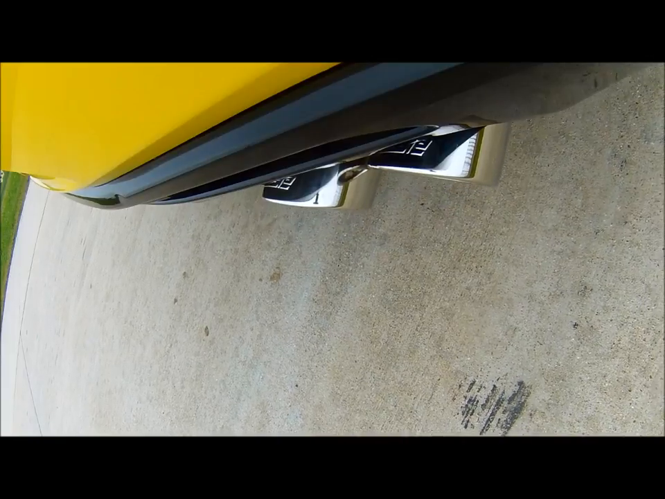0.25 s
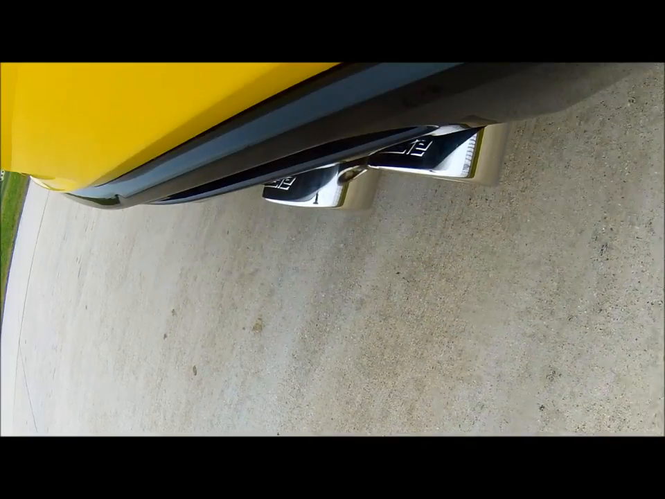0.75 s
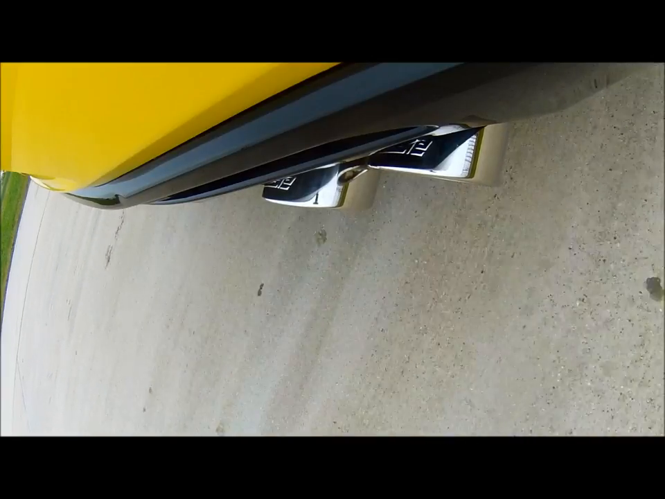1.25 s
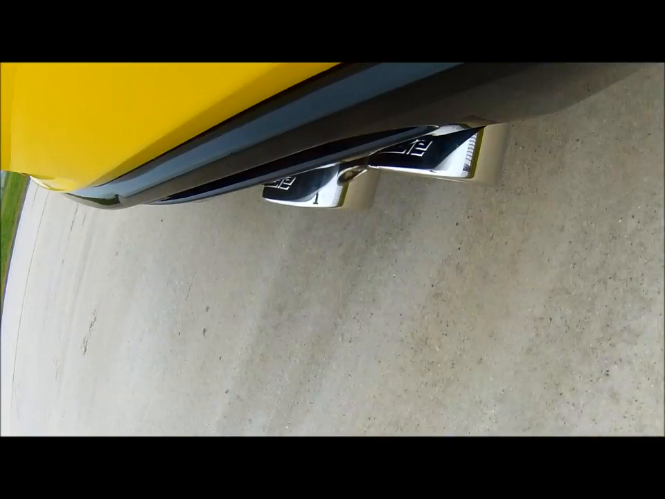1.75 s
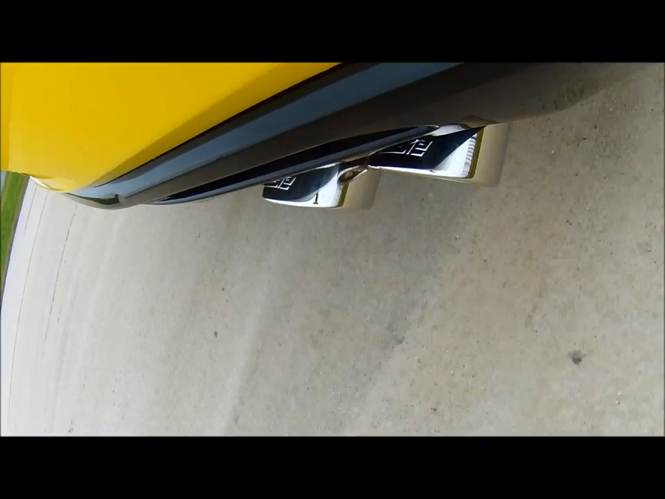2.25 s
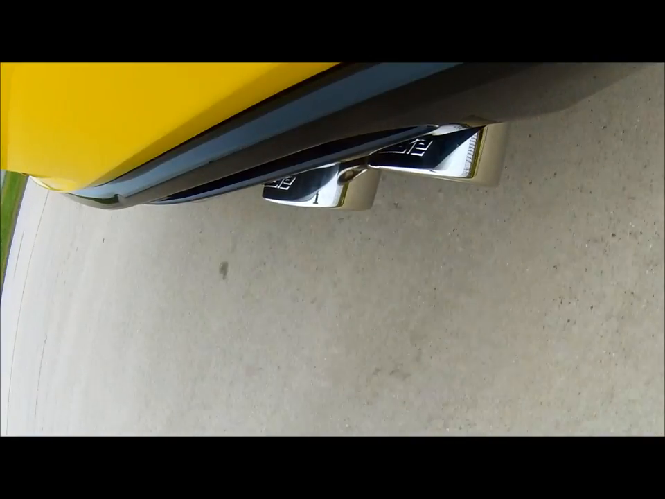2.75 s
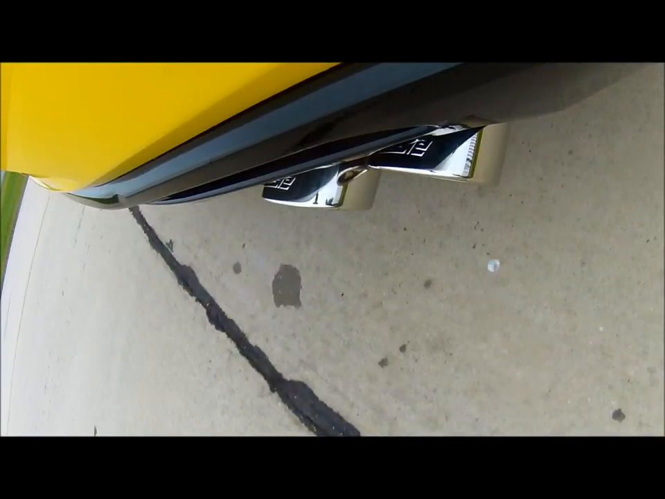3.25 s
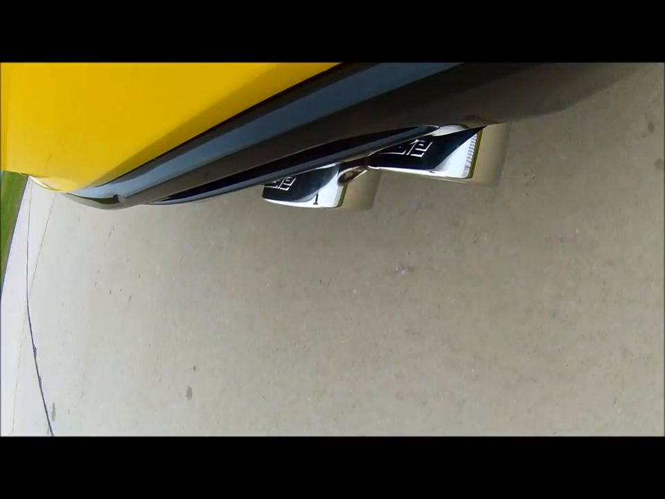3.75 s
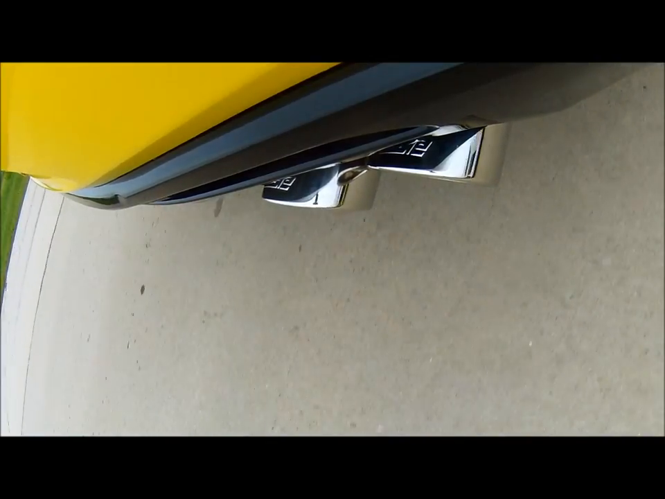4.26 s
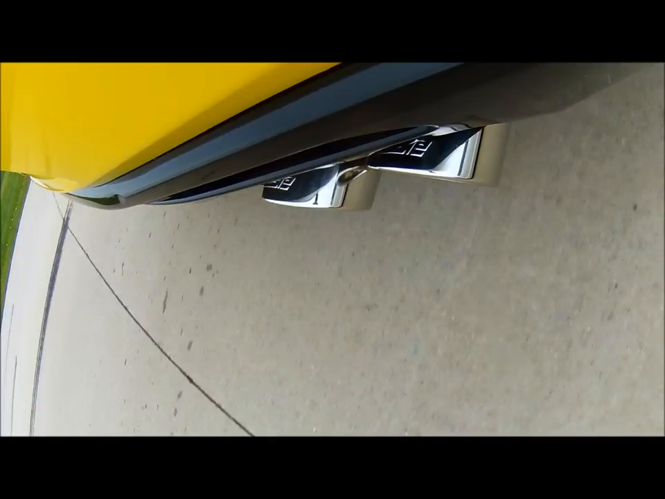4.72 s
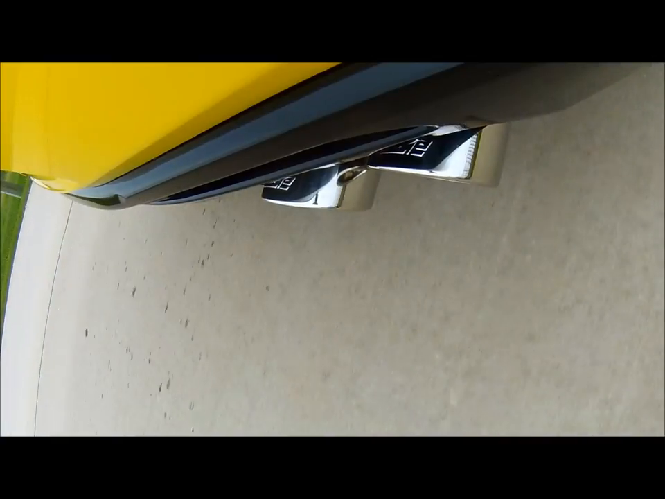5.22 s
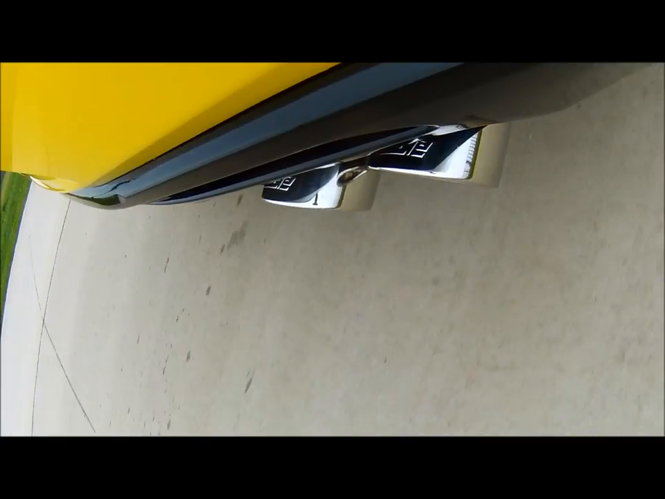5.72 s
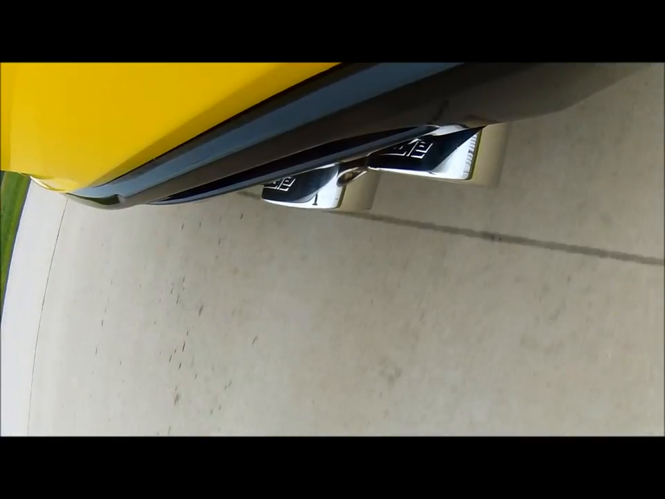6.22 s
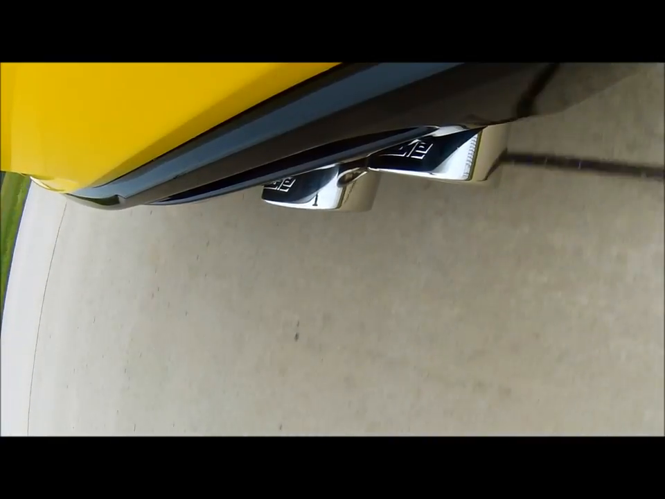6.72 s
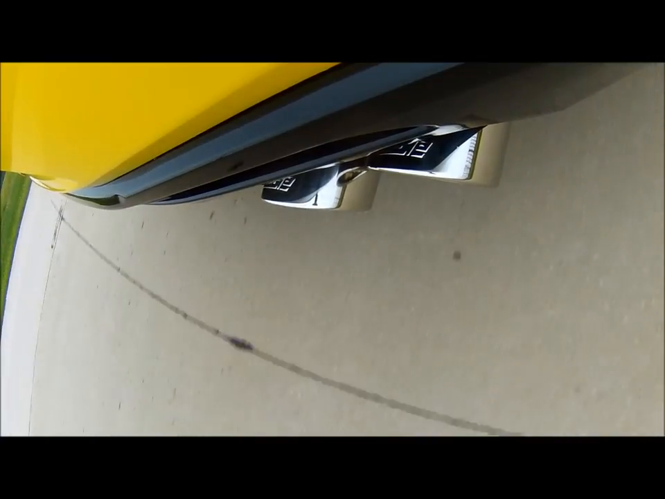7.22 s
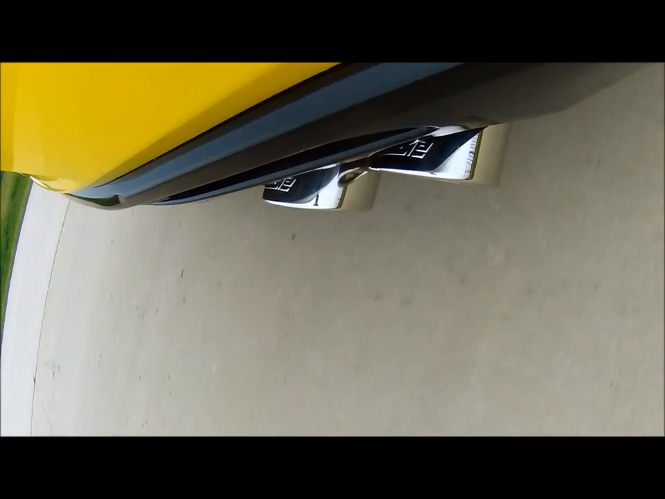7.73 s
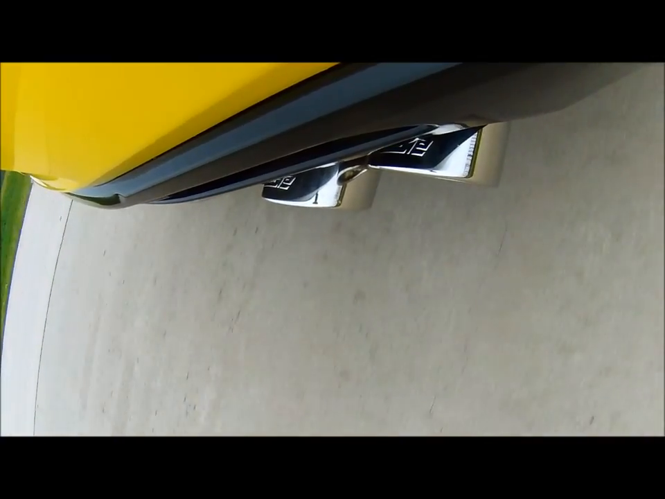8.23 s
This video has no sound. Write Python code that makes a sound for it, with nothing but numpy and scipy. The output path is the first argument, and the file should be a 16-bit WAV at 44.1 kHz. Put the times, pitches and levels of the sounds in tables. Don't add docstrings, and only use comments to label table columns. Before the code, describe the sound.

From a small sealed case just above the tailpipes: faint deep engine throb, ticking grit and low shuddering bumps, then a long hard acceleration. Clean tones and coarse roar rise about an octave and a half in pitch, with thin metal parts singing along. The throttle lifts, pitch sags amid dry rattling, and the next gear bites with a body thump and crackling exhaust blasts, clipped and very loud at the end.

```python
import sys
import numpy as np
from scipy import signal
from scipy.fft import rfft, irfft, next_fast_len
from scipy.io import wavfile

SR = 44100
rng = np.random.default_rng(int(sys.argv[2]) if len(sys.argv) > 2 else 0)


def wrap_up_sound(samples):
    columns = np.atleast_2d(samples).T
    tamed = np.clip(columns, -1, 1)
    steps = np.round(tamed * 32767).astype(np.int16)
    wavfile.write(sys.argv[1], SR, steps)


def level_to_linear(level):
    exponent = np.asarray(level, float) / 20
    return 10 ** exponent


N = 373968
PAD = next_fast_len(N + 8192)
HZ = np.fft.rfftfreq(PAD, 1 / SR) + 1e-3
BEAT_S = 8.397


def rms_one(x):
    return x / np.sqrt(np.mean(x ** 2) + 1e-20)


def in_time(rows):
    s, *columns = np.transpose(rows)
    return [np.interp(np.arange(N) / SR, s, column) for column in columns]


def drift(rate, size=1):
    pole = np.exp(-80 * np.pi * rate / SR)
    noise = rng.standard_normal(N // 40 + 2002)
    slow = signal.lfilter([1], [1, -2 * pole, pole * pole], noise)[2000:]
    return np.interp(np.arange(0, N, size) / 40, np.arange(len(slow)), rms_one(slow))


def band_pass(x, order, low_hz, high_hz):
    return signal.sosfilt(signal.butter(order, [low_hz, high_hz], "band", fs=SR, output="sos"), x)


def bursts(rows, rise_s, shape):
    t, out = np.arange(N) / SR, np.zeros(N)
    for s, level_db, length in rows:
        i = slice(int(s * SR), int((s + 8 * length) * SR))
        age = t[i] - t[i][0]
        out[i] += level_to_linear(level_db) * np.minimum(age / rise_s, 1) * np.exp(-(age / length) ** shape)
    return out * rng.standard_normal(N)


def electronics(shape):
    hiss = level_to_linear(-67.5) * signal.lfilter([1, .12], [1], rng.standard_normal(shape))
    whine = level_to_linear(-79) * np.sin(2 * np.pi * 7300 * np.arange(N) / SR)
    return hiss, whine


# (time [s], peak level [dB], pitch [Hz])
GRIT = [(.334, -44, 2310), (.366, -42, 1790), (.508, -51, 2240), (.694, -44, 2285), (.5, -40, 990),
        (.62, -37, 980), (.69, -34, 1000), (.768, -28, 1000), (.9, -35, 990), (1.2, -41, 2300),
        (2.16, -35.5, 2280), (2.284, -36, 2270), (2.433, -37, 2320), (2.522, -34, 2380),
        (.391, -46, 1810), (.4505, -48, 1820), (.468, -46, 1810), (.526, -46, 1830), (.6, -45, 1790),
         (.756, -45, 1770), (.775, -46, 1790), (.86, -46, 1802), (.9, -46, 1800), (.924, -48, 1810),
         (.995, -46, 1798), (1.03, -47, 1790), (1.08, -47, 1800), (1.542, -49, 1800), (1.632, -48, 1780),
         (2.159, -45, 1824), (2.377, -44, 1790), (2.527, -45, 1750), (.652, -40, 2380), (.74, -45, 2270),
         (.56, -45, 2880), (.63, -45, 2855), (.715, -44, 2870), (.77, -45, 2870), (1.9426, -44, 2250),
         (2.1436, -45, 2860), (2.2674, -43, 2870), (2.504, -40, 2270), (.8, -41, 1400), (.485, -40, 990),
         (.655, -38, 980), (.82, -38, 960), (.955, -40, 991), (1.09, -40, 987)]


def grit():
    out, age = np.zeros(N), np.arange(1500) / SR
    for s, level_db, hz in GRIT:
        i = int(s * SR)
        envelope = np.minimum(age / .0015, 1) * level_to_linear(level_db - 60 * age / .026)
        out[i:i + len(age)] += envelope * np.sin(2 * np.pi * hz * age)
    return out


# (resonance [Hz], width [Hz])
SHEETS = [(322, 16), (775, 45), (1010, 50), (2200, 110), (3360, 200)]
# (level at a roar of -50 dB [dB], share of the roar's swing [dB/dB])
SINGING = [(-54, 0.22), (-54, 0.62), (-67, 1), (-67.5, 1.27), (-65, 1.08)]
# (time [s], note [Hz], peak level [dB], loss either side [dB/s])
SWELLS = [(2.69, 322, -40.5, 33), (4.12, 322, -41, 37), (5.45, 322, -33, 37), (5.07, 322, -34, 24),
          (3.65, 322, -49, 13), (0.089, 322, -52, 20), (7.78, 322, -27, 83), (10, 322, -27, 146),
          (3.8, 775, -46.5, 5), (7.97, 2200, -27, 300), (8.015, 2200, -27.5, 300), (8.25, 2200, -19.5, 200),
          (8.29, 2200, -15, 200), (8.43, 2200, -12, 130), (0.73, 1010, -55, 32), (6.1, 1010, -22, 38),
          (6.71, 1010, -24.5, 40), (7.06, 1010, -21.5, 50), (7.45, 1010, -24, 60), (7.58, 1010, -18, 110),
          (8.22, 1010, -25.5, 120), (0.95, 322, -49, 18), (2.2, 322, -46, 15.5), (3.18, 3360, -53, 7),
          (3.8, 3360, -52, 6), (4.97, 3360, -44.5, 12.5), (5.83, 3360, -30, 19), (7.76, 3360, -41.5, 23)]


def sheets(bark_db):
    out, t = 0, np.arange(N) / SR
    for (hz, width), (base_db, share) in zip(SHEETS, SINGING):
        levels_db = [base_db + share * (bark_db + 50)]
        for s, note, peak_db, loss_db in SWELLS:
            if abs(note / hz - 1) < .2:
                levels_db.append(peak_db - loss_db * np.abs(t - s))
        ring = signal.iirpeak(hz, hz / width, SR)
        sung = signal.lfilter(*ring, signal.lfilter(*ring, rng.standard_normal(N)))
        flutter_db = np.minimum(np.sqrt(hz / 300), 1.8) * drift(20)
        out = out + level_to_linear(np.max(levels_db, axis=0) - 7.5 + flutter_db) * rms_one(sung)
    return out


# (time [s], peak level [dB])
RATTLE = [(2.414, -48), (7.673, -35), (7.675, -33), (7.681, -49), (7.736, -52), (7.805, -36), (7.830, -52),
          (7.872, -42), (7.876, -35), (7.881, -41), (7.905, -41), (7.914, -29), (7.917, -25), (7.9528, -32),
          (7.955, -35), (7.9605, -32), (8.023, -48), (8.092, -49), (8.1147, -39), (8.119, -41),
          (8.128, -27.5), (8.131, -34), (8.197, -48), (8.214, -33), (8.220, -31), (8.226, -44)]


def rattle():
    ticks = bursts([(s, level_db + 9, .0015) for s, level_db in RATTLE], rise_s=.00013, shape=.64)
    return band_pass(signal.lfilter(*signal.butter(1, 9000, fs=SR), ticks), 1, 2800, 6500)


# (time [s], pitch [Hz], level [dB], sag by its end [dB], lull before it [dB])
SWING = [(0.03, 29.6, -49, 1, -11), (0.21, 33, -44, 3, -8), (0.42, 38.86, -45, 3, -14),
         (0.66, 35.5, -35, 5, -4), (0.88, 32.95, -37.5, 4, -5), (1.12, 32, -36, 4, -4),
         (1.36, 38.94, -44, -3, -20), (1.53, 33, -40, 3, -2), (1.78, 30.96, -36, 7, -4),
         (1.94, 36.04, -30.5, 11, -6), (2.22, 34.03, -29.5, 1, -12), (2.38, 32.9, -31, 0.5, -6),
         (2.64, 29.44, -24, 0.5, -22), (3.0, 34.14, -31, -2.5, -6), (3.49, 32.5, -28, -1, -6),
         (3.93, 33.48, -26.5, -1.5, 0), (4.2, 31.5, -27.5, -2, 4), (4.38, 32, -26, -0.5, -19),
         (4.74, 32.9, -34, 0, -4), (4.89, 30.97, -27.5, -1.5, -13), (5.2, 33.8, -27.5, 2, 2),
         (5.49, 28.82, -25.5, 0, -5), (5.8, 29.5, -26, -5.5, 1), (6.15, 34.5, -27, -2.5, -3),
         (6.48, 32.8, -19, 1, -12), (6.64, 32.94, -17.5, 7, -7), (6.78, 30.9, -18.5, 11, 1),
         (6.89, 34.5, -17, 2, -10), (7.05, 31.9, -24.5, 6, -7), (7.27, 30.5, -16.5, 3, -16),
         (7.45, 37.7, -24, 0, -4), (7.6, 36.9, -16, -1, -3.5), (7.72, 27, -16, 3, -5.5),
         (8.06, 30.4, -13, 0.5, -15), (8.31, 31.0, -16, 0, -19)]


def swing():
    rise_s, fall_s = .057, .084
    ends = [row[0] for row in SWING[1:]] + [N / SR + fall_s]
    rows = []
    for (s, hz, level_db, sag_db, lull_db), end in zip(SWING, ends):
        rise, fall = np.minimum([rise_s, fall_s], (end - s) * .45)
        rows += [(s, hz, level_db + lull_db), (s + rise, hz, level_db), (end - fall, hz, level_db - sag_db)]
    hz, level_db = in_time(rows)
    turns = np.cumsum(hz) / SR
    tone = np.sqrt(2) * np.cos(2 * np.pi * (turns - turns[int(BEAT_S * SR)] - .1))
    buffet = rms_one(band_pass(rng.standard_normal(N), 4, 20, 52))
    rumble = rms_one(band_pass(rng.standard_normal(N), 2, 50, 140))
    rumble_db = -60.5 + 25.5 * np.exp(-((np.arange(N) / SR - 8.05) / .56) ** 2)
    wobble_db = 1.6 * drift(6) - 1
    return level_to_linear(rumble_db) * rumble + level_to_linear(level_db) * (level_to_linear(wobble_db) * tone + level_to_linear(-13) * buffet)


# (resonance [Hz], width [Hz], level rolling [dB], level under
# load [dB])
CASE = [(108, 114, -2, 1), (208, 88, 3.5, 1), (270, 38, -2.5, -4), (374, 59, 9, 1), (439, 150, 6, -4.5),
        (627, 112, -2, 0.5), (842, 185, 4, -4.5), (1003, 69, 7, 4), (1147, 214, 1.5, 1.5),
        (1411, 106, 3, -1.5), (1553, 120, -3.5, 3), (1790, 98, -0.5, -6), (2079, 232, -3.5, 2.5),
        (2323, 111, 2.5, -3.5), (2505, 88, -4.5, 5.5), (2810, 470, -7.5, -4.5), (3200, 68, -19, -5),
        (3373, 370, -9.5, -7.5), (3650, 140, -10, -8), (3966, 123, -21, -4.5), (4176, 780, -17.5, -13.5),
        (4833, 140, -31, -8), (5162, 270, -14.5, -5.5), (5700, 185, -19, -12), (6220, 380, -21.5, -16),
        (6650, 260, -28, -19), (7080, 750, -32.5, -29),
        (7950, 350, -40, -32), (8550, 600, -40, -32), (9950, 450, -44, -35), (11000, 600, -46, -40),
        (13300, 4000, -50, -46)]


def case(column, shift=1):
    power = 0
    for mode in CASE:
        detuning = (HZ / shift - mode[0] ** 2 / HZ * shift) / mode[1]
        power = power + level_to_linear(mode[column]) ** 2 / (1 + detuning ** 2) ** 2
    cepstrum = irfft(np.log(power + 1e-12) / 2, PAD)
    cepstrum[1:PAD // 2] *= 2
    cepstrum[PAD // 2 + 1:] = 0
    return np.exp(rfft(cepstrum))


# (time [s], crack level [dB], length [s], ring level [dB])
BARKS = [(8.349, -20, 0.0024, -1), (8.3565, 3.5, 0.0036, -13), (8.3882, 3, 0.0061, -22),
         (8.397, 2.5, 0.0043, -8), (8.404, -16, 0.0024, -8), (8.412, -10, 0.0015, -8),
         (8.416, -9, 0.0021, -5), (8.427, -14, 0.0028, -1), (8.4362, 4, 0.0052, -13),
         (8.445, -20, .002, -9), (8.456, -15, 0.002, -2), (8.467, -4, 0.003, -2), (8.4762, 8.5, 0.0048, -5)]
# (time [s], peak level [dB], length [s])
SLAM = [
    (8.382, -16, 0.022),
]


def barks(loaded):
    gas = bursts([row[:3] for row in BARKS], rise_s=.0012, shape=1.3)
    mouth = bursts([(s, ring_db, length) for s, _, length, ring_db in BARKS], rise_s=.0011, shape=1.37)
    crack = rfft(gas, PAD) * loaded / (1 + (1500 / HZ) ** 4)
    mouth_hz, mouth_width_hz = 1400, 250
    ring = 1.4 * rfft(mouth, PAD) / (1 + 1j * (HZ - mouth_hz) / mouth_width_hz) ** 2
    slam = band_pass(bursts(SLAM, rise_s=.0068, shape=1.7), 2, 50, 160)
    return level_to_linear(12.5) * irfft(level_to_linear(-3.5) * crack + ring, PAD)[:N] + level_to_linear(-44) * gas + level_to_linear(9) * slam


def roar(cycle, firing_hz, bark_db, load, rolling, loaded, hot):
    firing = 8 * cycle
    since = np.arange(N) / SR - 8.277
    boom_db = -3.5 - 18 * load
    sharp_db = load * (7.5 + 2.5 * np.log2(firing_hz / 200))
    snap_db = 6 * np.exp(-np.abs(since / np.where(since > 0, .12, .004)))
    hiss_db = -11 - .12 * (bark_db + 50) + sharp_db + snap_db
    heat = np.clip(.4 + .45 * drift(3), 0, 1)
    below = 1 / (1 + (HZ / 720) ** 12)
    above = 1 / (1 + (3000 / HZ) ** 24)
    repeating = rng.standard_normal(4096)[(cycle % 1 * 4096).astype(int)]
    # (band, level over the bark [dB], share that repeats, heat)
    bands = [(below, boom_db + 2.5, .06, 0), (1 - below - above, -.3, .33, heat), (above, hiss_db - .1, 0, 0)]
    out = 0
    for band, level_db, share, warm in bands:
        each_db = 1.6 * rng.standard_normal(int(firing[-1]) + 1)[firing.astype(int)]
        strength = level_to_linear(each_db + .9 * drift(16))
        puff = .55 + .25 * load + np.exp(-3 * (firing % 1))
        turbulent = rms_one(rng.standard_normal(N) * strength * puff)
        puffs = rfft(np.sqrt(1 - share) * turbulent + np.sqrt(share) * repeating, PAD) * band
        soft, hard = (rms_one(irfft(puffs * colour, PAD)[:N]) for colour in (rolling, loaded))
        if np.any(warm):
            heated = rms_one(irfft(puffs * hot, PAD)[:N])
            hard = ((1 - warm) * hard + warm * heated) / np.sqrt(1 - warm * (1 - warm))
        out = out + level_to_linear(bark_db + level_db) * ((1 - load) * soft + load * hard)
    return out


def drones(table, hz):
    return np.sqrt(sum(level_to_linear(level_db) ** 2 / (1 + (2 * (hz - centre) / width) ** 2) ** 2
                       for centre, width, level_db in table))


# (resonance [Hz], width [Hz], level [dB])
FIRING_DRONES = [(44.2, 9, -36.5), (54.4, 9.6, -40.5), (94.3, 21, -41), (111.5, 34, -39.5),
                 (125.2, 7.7, -34), (160, 18.2, -33), (214.3, 44, -33), (231, 11, -35), (275, 20, -38.5)]
# (resonance [Hz], width [Hz], level [dB])
OCTAVE_DRONES = [(87, 12, -60), (158.6, 24, -54), (103, 21, -55), (125.3, 11.5, -48.5), (185, 12, -50),
                 (220, 25, -48), (355, 48, -27.5), (426, 43, -35), (479, 53, -30.5), (538, 52, -33.5)]
# (multiple of the engine cycle [-], level [dB])
ORDERS_DB = [(2, -1.5), (3, 0), (4, 0), (5, 2), (6, 5), (7, -14), (9, -8), (10, -7.5), (11, -3.5), (12, 1),
             (13, -1), (14, 4.5), (15, -3), (17, -0.5), (18, 1.5), (19, 1), (20, -1.5), (21, 3.5), (22, 4),
             (23, 3), (24, 9), (25, -8), (26, 4), (27, -1), (28, 3.5), (29, 4), (30, 0), (32, 3.5), (33, 1),
             (34, 3), (35, -0.5), (36, -4), (37, 0.5), (38, -2.5), (39, -5), (40, -3), (42, 3), (43, -2),
             (44, -3.5), (48, -2), (52, -8)]
# (frequency [Hz], gain [dB])
PIPE = [(32, 21), (55, 5), (95, -3), (160, -10), (230, -7.5), (305, -7.5), (332, 6.5), (362, 0.5),
        (435, -2), (520, -2), (620, -3), (760, -7), (1000, -6.5), (2000, -7.5)]
# (multiple of the engine cycle [-], creeping [dB], rolling [dB])
ROLLING = [(5, -3, 3), (6, -3.5, -4), (9, -4, -3), (10, -4, -1), (11, -1, 8), (12, -9, -8), (14, -8, -3),
           (15, -3, -8), (17, -3, -7), (18, -5, 1), (19, -8, -3), (20, -2, -12), (21, 4, 2), (22, 3, -3),
           (23, 5, 8), (24, 1.5, -5), (26, 4, 4), (27, 0, 5.5), (28, 4, 1), (29, 3, 0), (32, 6, 7),
           (33, -5, -1), (34, -4, -8), (35, -4, 2), (36, 9, -4), (37, 1, -4), (38, 5, 3), (40, 3, -11),
           (42, -4.5, 5), (43, 7, 4), (44, 5.5, 0), (48, 0, -7), (52, 0, -5)]
# (multiple of the engine cycle [-], gain [dB])
BITE = [(4, 11.5), (8, -9.5), (10, 13), (12, 17.5), (14, -8), (20, 14), (22, 7), (24, 9.5), (26, 7),
        (28, 6), (32, 10), (34, 8), (40, -6), (44, 0), (48, 9), (52, 30.5)]
# (multiple [-], level [dB], start [s], length [s])
OVERRUN = [
    (10, -31.5, 7.62, 0.13),
    (11, -29, 7.7, 0.23),
    (17, -35, 7.66, 0.25),
    (13, -39, 7.9, 0.15),
]


def tones(cycle, firing_hz, effort_db, load):
    t = np.arange(N) / SR
    bite = np.clip((t - 8.33) / .069, 0, 1)
    bite_db = dict(BITE)
    turn = 2 * np.pi * (cycle - cycle[int(BEAT_S * SR)])
    waver = level_to_linear(.8 * drift(7))
    slip = .2 * drift(4) * (1 - bite)
    first = drones(FIRING_DRONES, firing_hz) * level_to_linear(bite * bite_db[8]) * np.cos(8 * turn + slip)
    octave = drones(OCTAVE_DRONES, 2 * firing_hz) * np.cos(16 * turn + 2 * slip)
    out = level_to_linear(effort_db + 3.2) * waver * (first + octave)

    coarse = slice(None, None, 64)
    hz, bite, load = firing_hz[coarse], bite[coarse], load[coarse]
    other_db = -58.5 + .132 * (hz - 100) + effort_db[coarse]
    rolls = np.clip((hz - 68) / 12 + .5, 0, 1)
    light_db = {k: creep_db + rolls * (roll_db - creep_db) for k, creep_db, roll_db in ROLLING}
    pipe_hz, pipe_db = np.transpose(PIPE)
    for (k, level_db), start in zip(ORDERS_DB, rng.random(len(ORDERS_DB))):
        pitch_hz = hz * k / 8
        passed_db = np.interp(np.log(pitch_hz), np.log(pipe_hz), pipe_db)
        passed_db += load * 9 * np.exp(-((pitch_hz - 368) / 32) ** 2)
        throttle_db = bite * bite_db.get(k, 0) + (1 - load) * light_db.get(k, 0)
        gain = level_to_linear(other_db + level_db + passed_db + throttle_db + 2.2 * drift(3.5, size=64))
        phase = 2 * np.pi * start * (k % 4 > 0)
        out += np.interp(t, t[coarse], gain) * np.cos(k * turn + phase)
    for k, level_db, s, length in OVERRUN:
        envelope = np.sqrt(np.abs(np.sin(np.pi * np.clip((t - s) / length, 0, 1))))
        out += level_to_linear(level_db) * envelope * np.sin(k * turn)
    return out


# (time [s], firing rate [Hz])
FIRING = [(0.0, 42.2), (0.3, 45.1), (0.55, 55.0), (0.75, 59.3), (1.3, 58.3), (1.95, 58.0), (2.2, 62.2),
          (2.7, 77.2), (2.95, 88.4), (3.3, 93.0), (3.55, 90.8), (3.9, 84.6), (4.15, 82.4), (4.35, 85.6),
          (5.4, 124.2), (5.8, 152.6), (6.55, 214.0), (6.85, 234.7), (7.5, 274.0)]
# (time [s], roar level [dB])
ROAR = [(0.0, -62), (0.25, -60.5), (0.45, -52.5), (0.7, -49), (1.2, -54.5), (2.0, -54.5), (2.25, -52),
        (2.75, -48), (3.05, -44.5), (3.5, -44), (3.85, -47), (4.25, -47), (4.55, -42.5), (5.05, -40),
        (5.4, -34), (6.1, -23.5), (7.3, -22), (7.5, -20.5)]
# (time [s], load [0-1])
LOAD = [(0, 0), (4.4, 0.03), (5.3, 0.13), (5.55, 0.27), (5.9, 0.76), (7.6, 1), (7.625, 0.16), (8.18, 0.16),
        (8.25, 0.62), (8.3, 0.83), (8.48, 0.65)]
# (time [s], firing rate [Hz], roar level [dB], tones over their law [dB])
SHIFT = [
    (7.6, 275.0, -25.5, -1),
    (7.63, 271.1, -28, -9),
    (7.7, 258, -31.5, -7),
    (8.0, 220.0, -34.5, -16.5),
    (8.12, 165, -35.5, -4.5),
    (8.2, 181.2, -29, -4.5),
    (8.3, 211.6, -18.5, 1.5),
    (8.38, 201.2, -16.5, 13.5),
    (8.42, 198.5, -13.5, 12),
]


def driving():
    firing_hz, = in_time(FIRING + [row[:2] for row in SHIFT])
    bark_db, = in_time(ROAR + [row[::2] for row in SHIFT])
    effort_db = in_time(SHIFT)[2] - SHIFT[0][3]
    load = np.clip(in_time(LOAD)[0], 0, 1)
    return firing_hz, bark_db, effort_db, load


def scene():
    firing_hz, bark_db, effort_db, load = driving()
    cycle = np.cumsum(firing_hz) / 8 / SR
    rolling, loaded, hot = case(column=2), case(column=3), case(column=3, shift=1.025)
    surroundings = grit() + sheets(bark_db) + rattle() + swing()
    engine = barks(loaded) + roar(cycle, firing_hz, bark_db, load, rolling, loaded, hot)
    engine = engine + tones(cycle, firing_hz, effort_db, load)
    return (surroundings + engine)[None]


def roll_off(x):
    return signal.sosfilt(signal.butter(12, 15530, fs=SR, output="sos"), x)


def record(dry):
    hiss, whine = electronics(dry.shape)
    mix = np.clip(dry + hiss + whine, -1, 1)
    return roll_off(mix)


dry = scene()
out = record(dry)
wrap_up_sound(out)
```